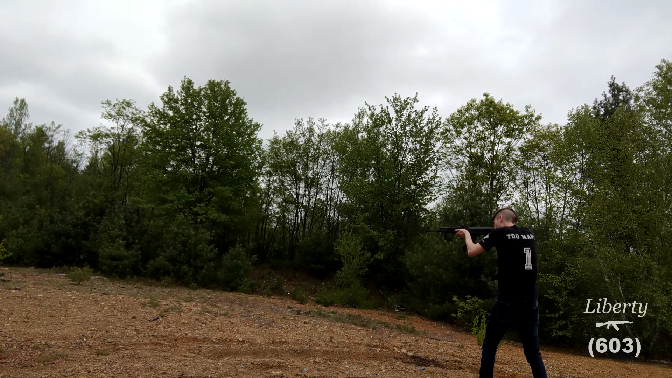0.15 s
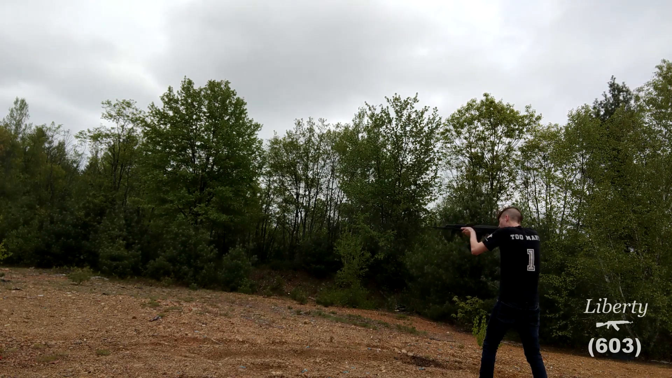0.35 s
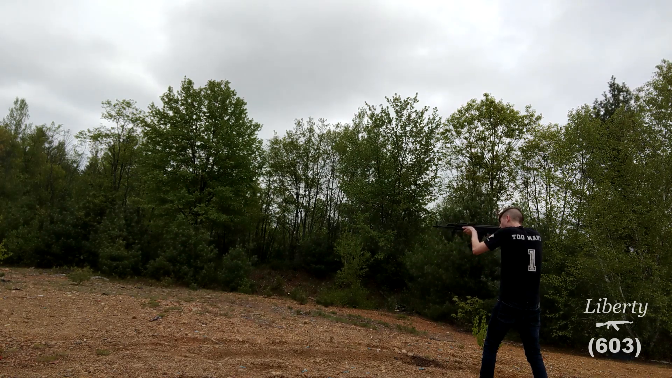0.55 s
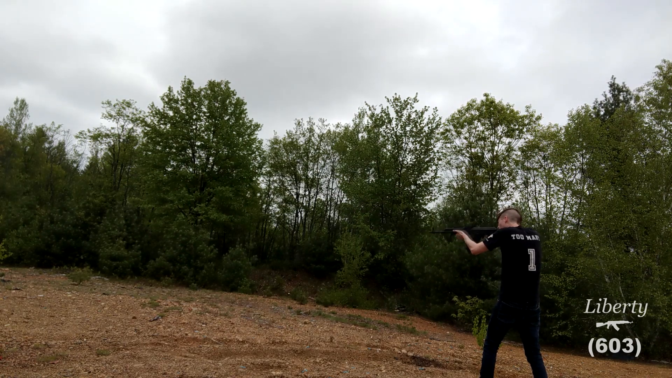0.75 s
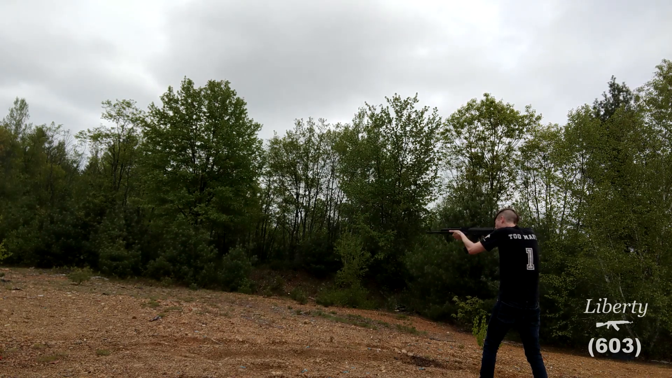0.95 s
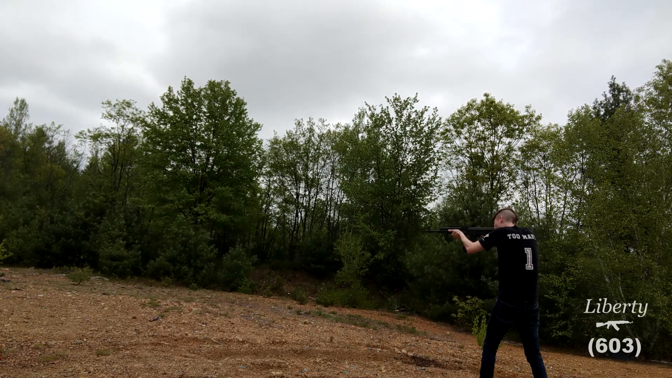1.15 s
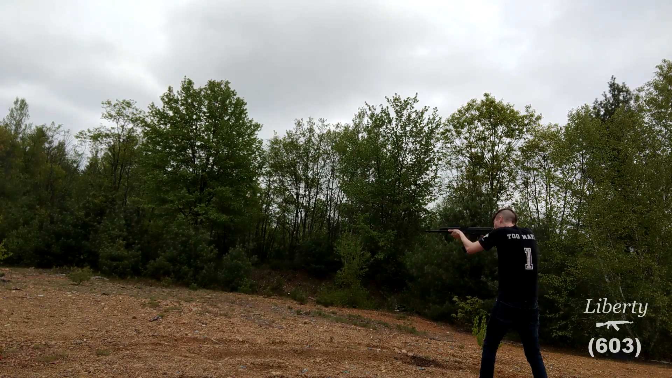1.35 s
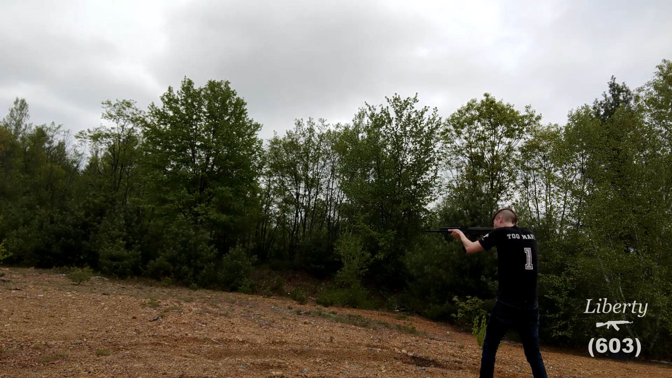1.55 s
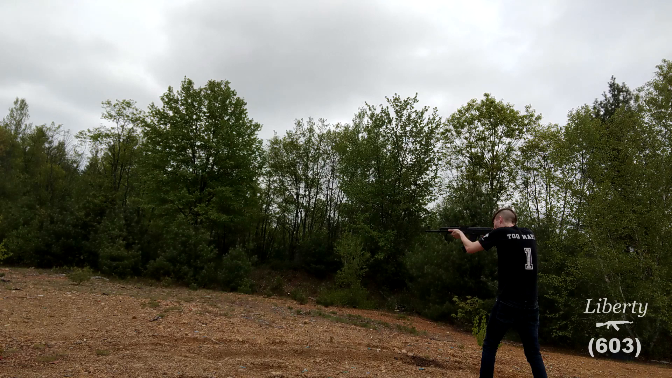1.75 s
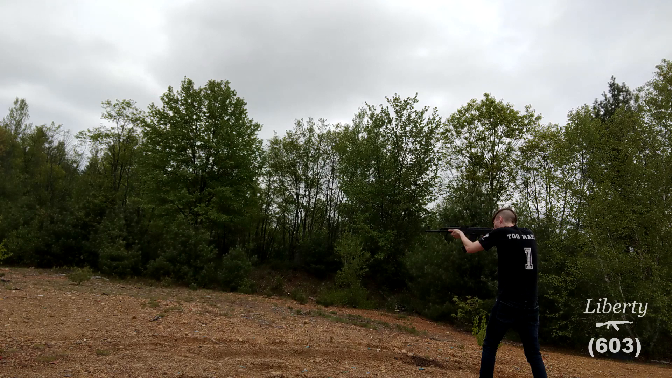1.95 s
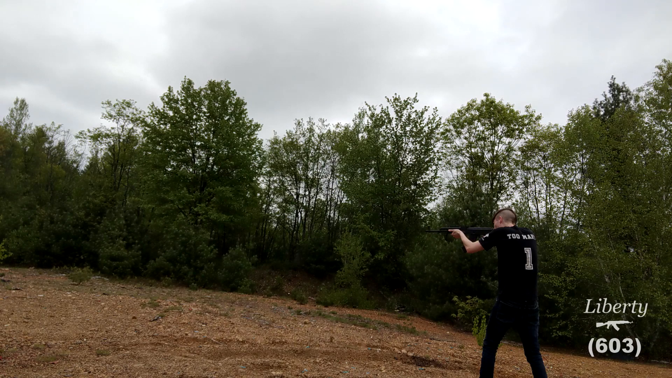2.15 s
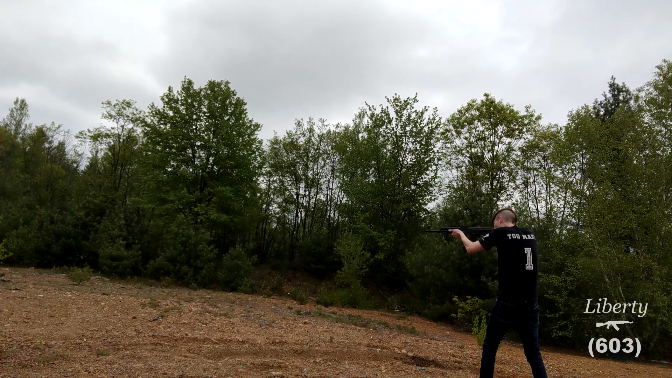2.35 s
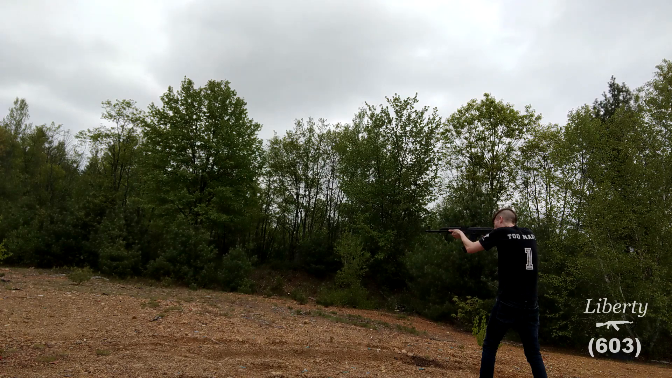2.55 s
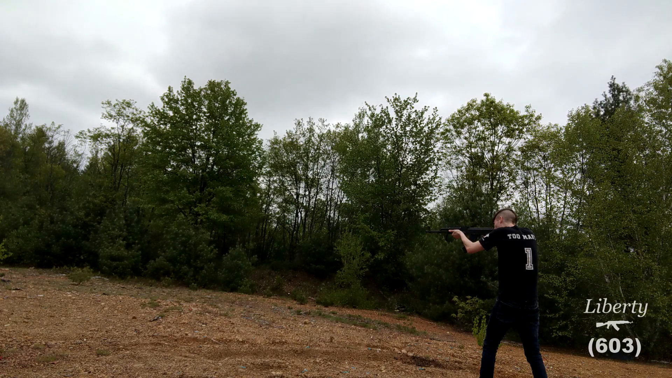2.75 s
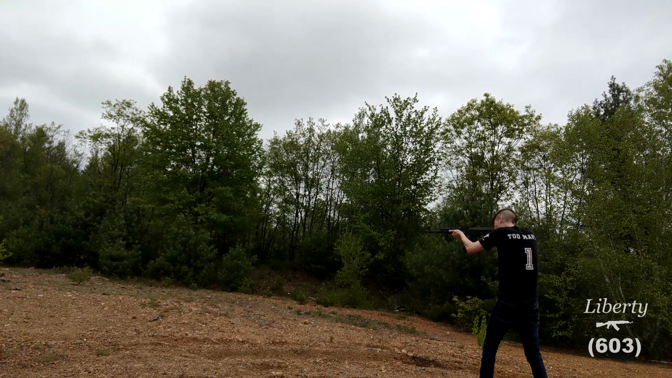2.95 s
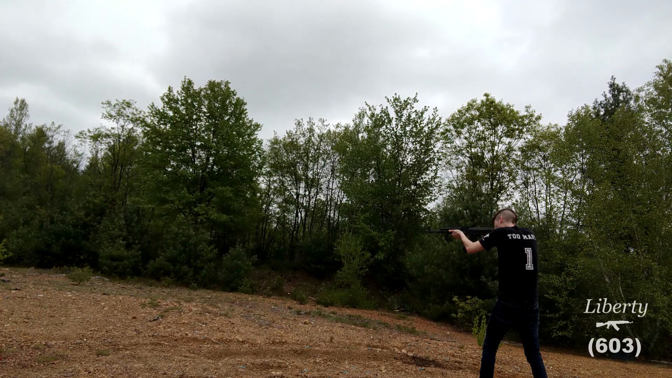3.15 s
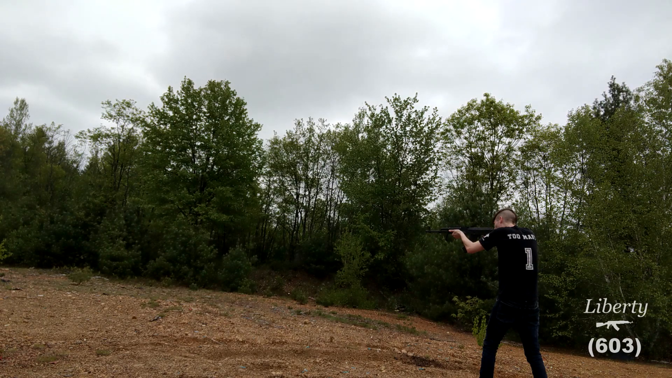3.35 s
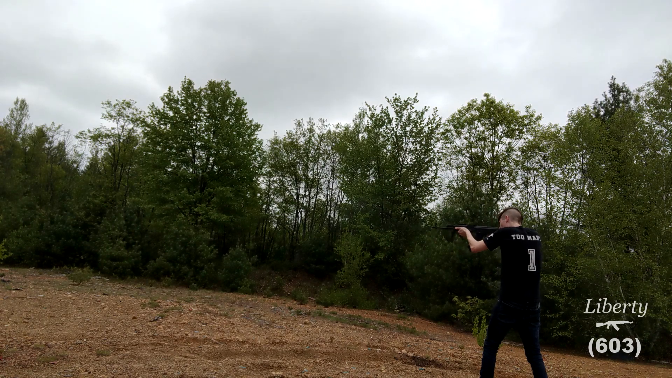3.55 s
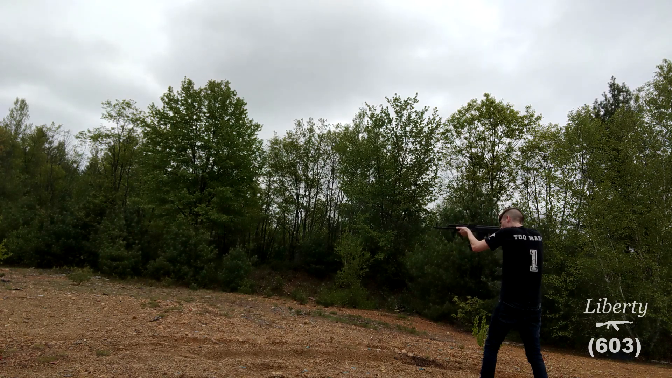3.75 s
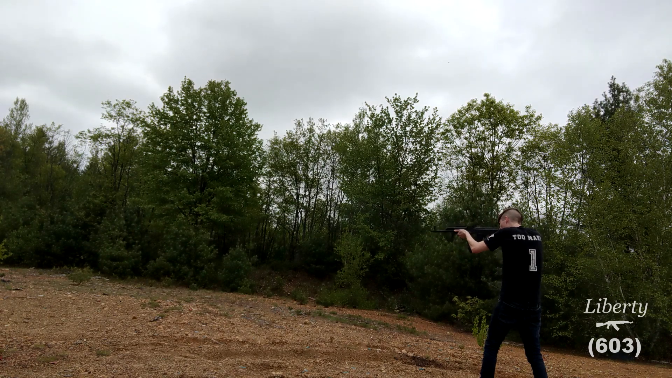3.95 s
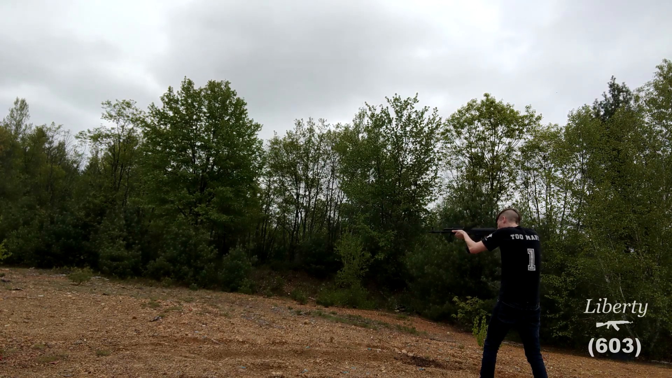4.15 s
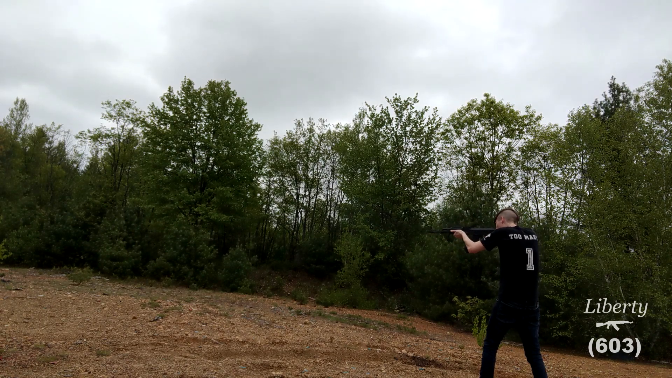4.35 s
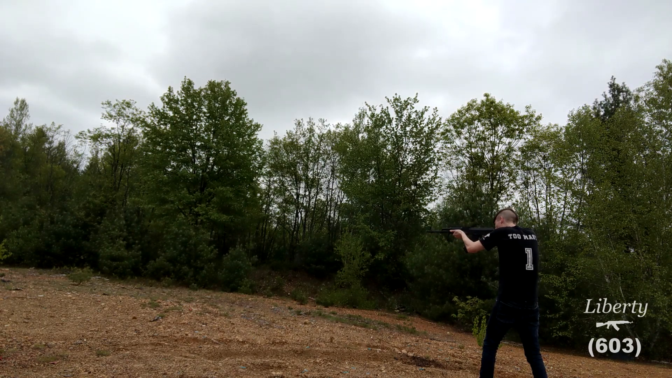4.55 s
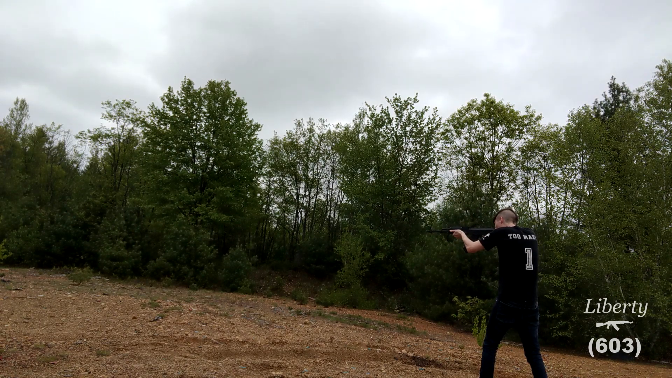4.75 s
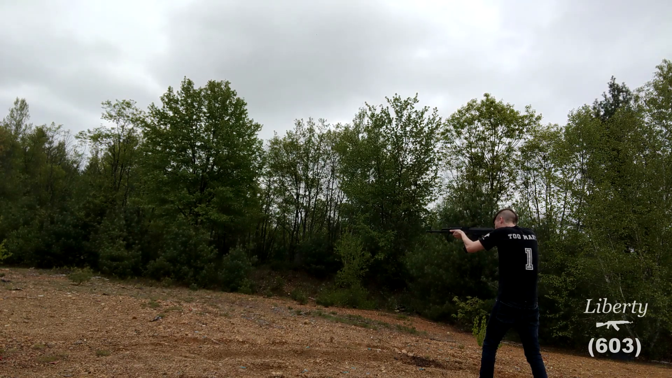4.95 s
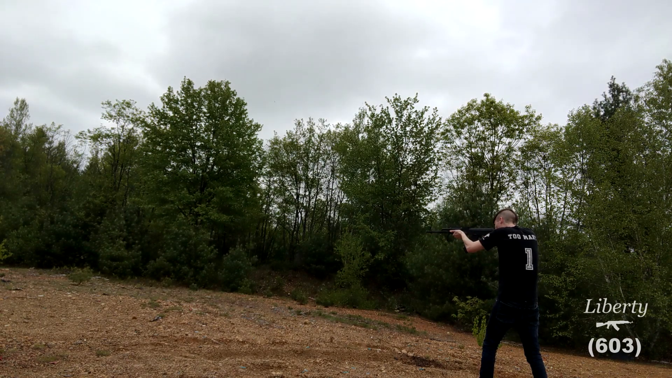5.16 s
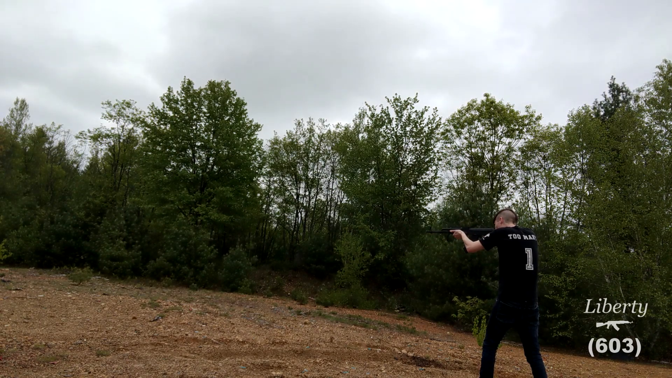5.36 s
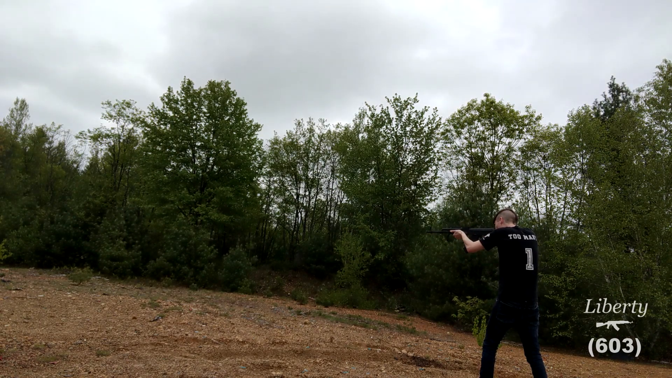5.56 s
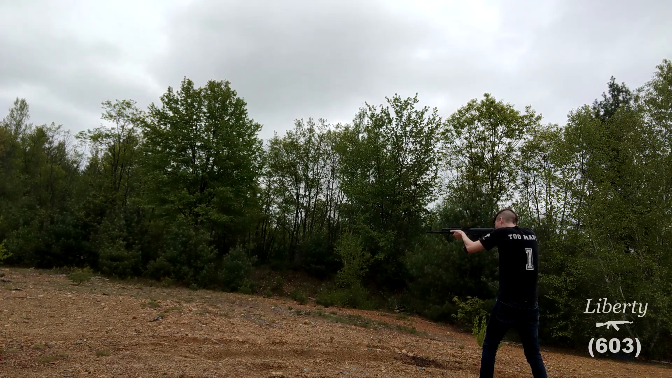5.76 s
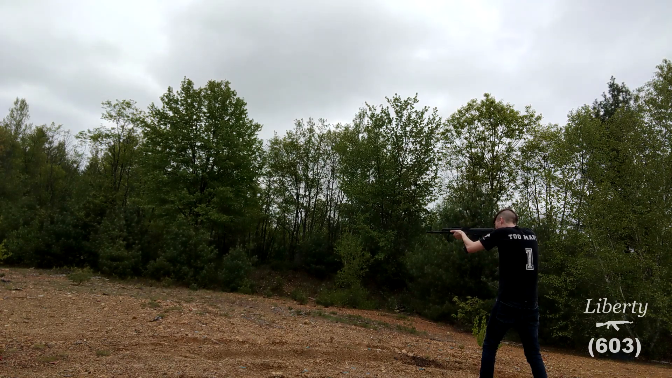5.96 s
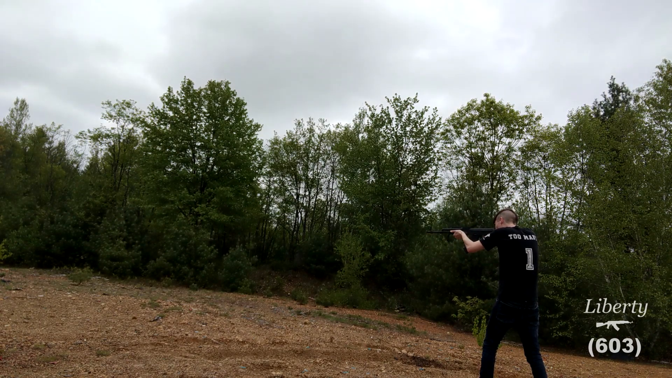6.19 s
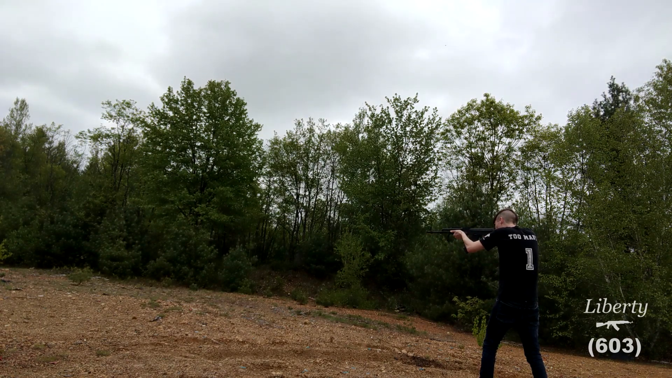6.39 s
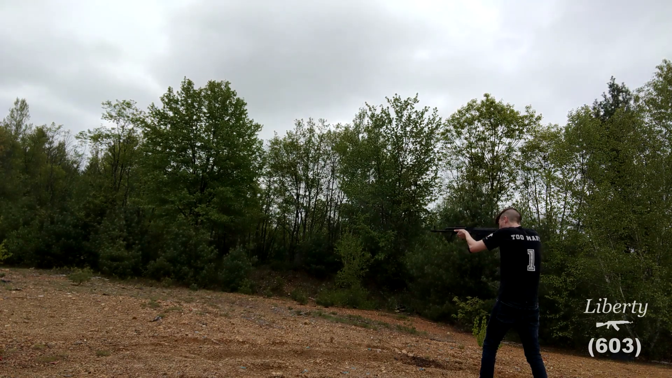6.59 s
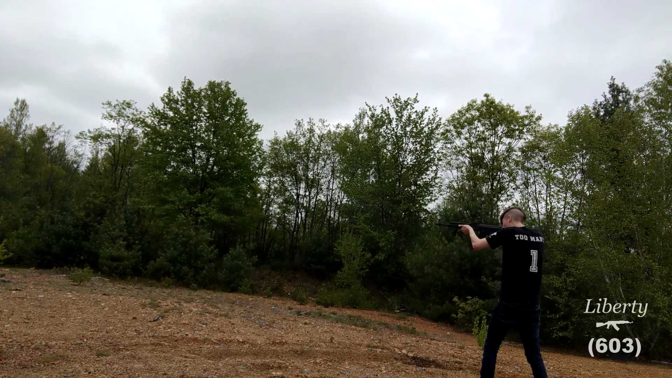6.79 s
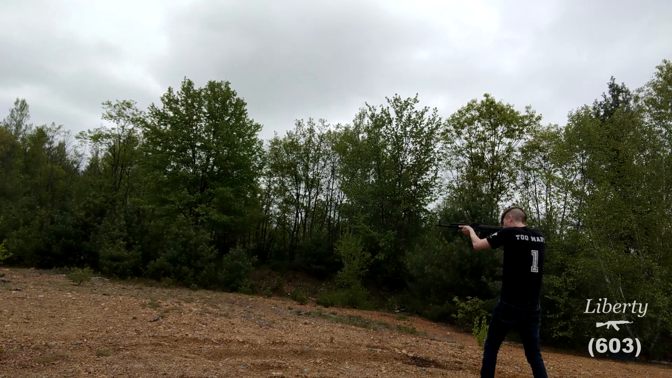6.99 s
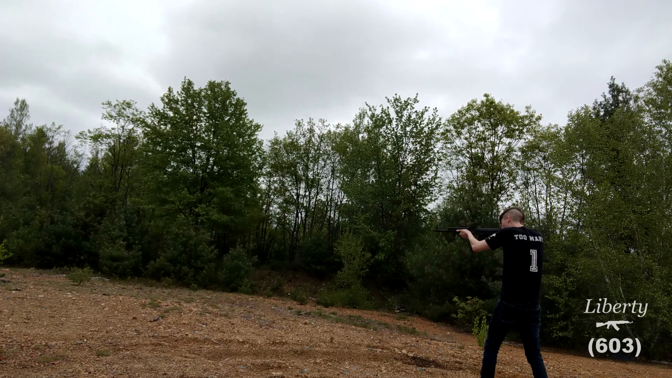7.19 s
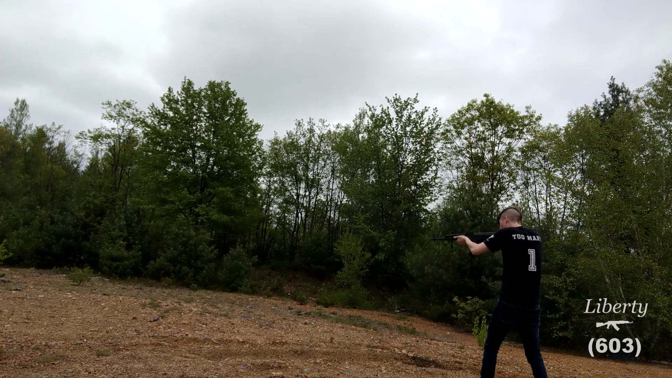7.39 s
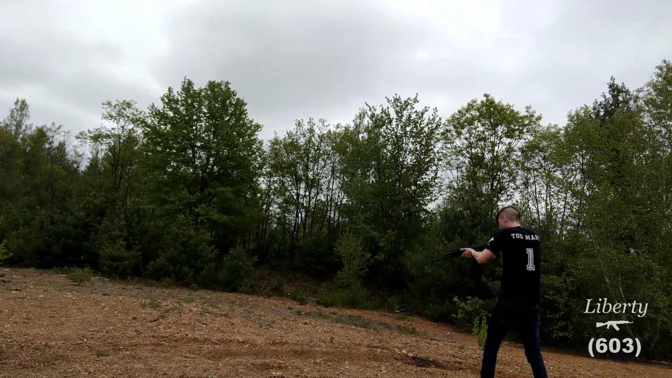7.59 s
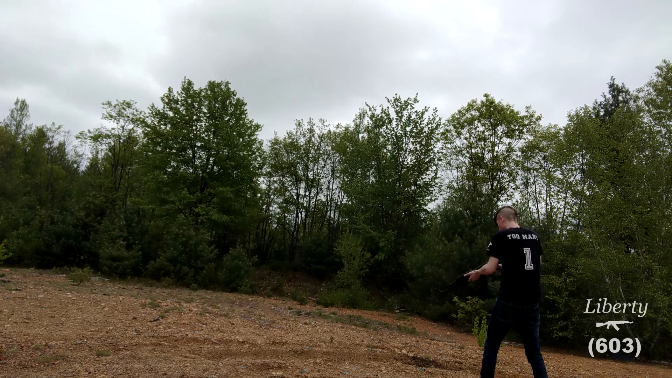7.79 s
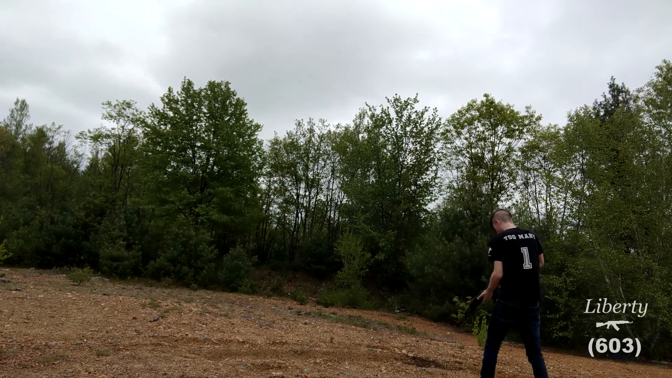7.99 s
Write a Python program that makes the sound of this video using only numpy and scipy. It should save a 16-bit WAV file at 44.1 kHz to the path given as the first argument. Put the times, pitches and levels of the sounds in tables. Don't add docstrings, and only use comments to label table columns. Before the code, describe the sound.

A quiet outdoor clearing opens with faint rustle and light microphone hiss. At 0.3 s a rifle shot cracks, abrupt and overloaded, with a dense body and short boom; slaps return within about a tenth of a second, then scattered tree echoes roll away, losing treble over two seconds. Tiny brass tinks skip on stones around 1.5 to 1.8 s, and a soft low thump comes at 1.2 s as the microphone gain shifts. Low gusts swell near 2.3 and 3.3 s. The second shot, loudest and boomiest, hits at 3.5 s with a similar long echo, a thump near 4.5 s and clinks at 4.6 to 5.3 s. A gust rises before the third shot at 6.6 s, which is leaner in bass. Its echo fades beneath a clear bright case tink at 7.56 s and more near 8 s.

```python
import sys
import numpy as np
from scipy import signal
from scipy.fft import rfft, irfft
from scipy.io import wavfile
from scipy.ndimage import uniform_filter1d, map_coordinates

SR = 44100
rng = np.random.default_rng(int(sys.argv[2]) if len(sys.argv) > 2 else 0)


def voltage_ratio(level):
    return 10 ** (np.asarray(level, float) / 20)


def master(y):
    cut = np.clip(np.atleast_2d(y).T, -1, 1)
    pcm = np.round(cut * 32767)
    wavfile.write(sys.argv[1], SR, pcm.astype(np.int16))


N = 354105


def unit(x):
    return x / np.sqrt(np.mean(x ** 2) + 1e-20)


def along(points, hz):
    f, v = np.transpose(points)
    return np.interp(np.log(hz + 1), np.log(f + 1), v)


def filtered(x, gain):
    return irfft(rfft(x) * gain(np.fft.rfftfreq(x.shape[-1], 1 / SR)), x.shape[-1])


def coloured(x, gain):
    return unit(filtered(x, gain))


def hump(centre_hz, octaves):
    return lambda hz: np.exp(-.5 * (np.log2((hz + 1) / centre_hz) / octaves) ** 2) / np.sqrt(hz + 50)


def wobble(rate_hz, length):
    knots = rng.standard_normal(int(length * rate_hz / SR) + 4)
    return map_coordinates(knots, [np.arange(length) * rate_hz / SR])


def add(track, s, sound):
    part = track[round(s * SR):][:len(sound)]
    part += sound[:len(part)]


# (frequency [Hz], share [0-1])
SAME = [(100, 1), (600, .85), (2000, 0.6), (5000, 0.047)]


def echo_noise(place, fresh):
    share = np.clip(along(SAME, np.fft.rfftfreq(len(place), 1 / SR)), 0, 1)
    spectrum = rfft(place) * np.sqrt(share) + rfft(fresh) * np.sqrt(1 - share)
    return irfft(spectrum, len(place))


# (delay [s], t60 [s], level [dB], centre [Hz], width [octaves])
LEAD = [
    (-.026, .015, -58, 9000, .12),
    (-.026, .015, -60, 6300, .12),
    (-.007, .009, -28, 5000, 1.3),
    (-.0065, .015, -27, 1900, .5),
    (-.002, .02, -31, 3000, 1.5),
]
# (rise [s], t60 [s], level [dB], centre [Hz], width [octaves])
MUZZLE = [
    (0.00078, 0.052, 2, 150, 0.54),
    (0.0025, 0.073, 3, 400, 0.41),
    (.004, 0.065, 10, 885, .4),
    (0.00081, .07, 5, 2500, 0.74),
    (0.0012, 0.073, 3.5, 6000, 0.65),
    (.0005, 0.02, 0, 8000, 0.62),
]
# (delay [s], t60 [s], level [dB], centre [Hz], width [octaves])
SLAPS = [(.025, .2, -16.5, 1784, 2), (.056, 0.11, -8.5, 6000, 0.76), (.063, 0.086, -5, 1919, 1.3),
         (.078, .02, -10, 8210, 0.58), (.096, .07, -10.5, 1200, 1.1), (.1055, .008, -5.5, 6000, .9),
         (.125, .18, -10.5, 746, .65), (.125, .15, -28.5, 100, 0.62)]
# (delay [s], level [dB], centre [Hz])
TRUNKS = [(0.289, -28, 414.6), (.38, -18.5, 1680), (0.442, -16, 1300), (.45, -31, 350),
          (0.507, -23.5, 327.7), (0.652, -25.5, 345), (.72, -24, 345), (.81, -24, 332), (1.03, -26, 400)]


def returns():
    rise_share, trunk_rise_s, trunk_t60_s, trunk_octaves = .03, 0.0051, 0.12, 0.45
    near = [(delay, rise_share * t60, t60, *rest) for delay, t60, *rest in LEAD + SLAPS]
    muzzle = [(0, *row) for row in MUZZLE]
    far = [(delay, trunk_rise_s, trunk_t60_s, db, hz, trunk_octaves) for delay, db, hz in TRUNKS]
    return near + muzzle + far


# (time [s], peak [dB], boom [dB], slap [dB])
SHOTS = [
    (0.318, 8.5, 3.5, -2),
    (3.508, 9.5, 5, -2.5),
    (6.631, 8.5, -2, -3),
]
# (far edge late [s], 400 Hz tilt [dB], 1300 Hz tilt [dB], bright trunks [dB])
BEARING = [(-.03, -0.5, 1.5, 8), (.02, 0.04, 0.15, 0.5), (.045, 1, -1.5, -4)]


def blasts():
    push_late_s, push_s, push_hz = .003, 0.005, 62
    out, t = np.zeros(N), np.arange(SR // 2) / SR
    bursts = returns()
    place = rng.standard_normal((len(bursts), len(t)))
    for (s, peak_db, boom_db, slap_db), (*_, bright_db) in zip(SHOTS, BEARING):
        u = t / push_s
        push = np.sin(2 * np.pi * push_hz * t) * u * np.exp(-u)
        add(out, s + push_late_s, -voltage_ratio(boom_db + 13.5) * push)
        for noise, (delay, rise, t60, level_db, hz, octaves) in zip(place, bursts):
            burst = coloured(echo_noise(noise, rng.standard_normal(len(t))), hump(hz, octaves))
            shape = (1 - np.exp(-t / rise)) * voltage_ratio(-60 * t / t60)
            db = peak_db + level_db
            db += slap_db * (delay > .03) + boom_db * (hz < 200)
            db += bright_db * (delay > .3 and hz > 900)
            add(out, s + delay, voltage_ratio(db) * shape * burst)
    return out


# (delay [s], rise [s], fade [dB/s])
STANDS = [
    (.115, .025, 190.5),
    (0.088, 0.031, 35.5),
    (0.328, 0.057, 51.5),
    (.43, .015, 62.5),
    (.48, 0.07, 27),
    (0.641, 0.04, 39),
    (.95, .35, 10),
]
# (400 Hz [dB], 1300 Hz [dB], 5500 Hz [dB])
STAND_DB = [(-11, -15.5, -28.5), (-22.5, -7.5, -12), (-36, -18, -15), (-28, -17.5, -31), (-19, -13.5, -29),
            (-24.5, -23, -72), (-34, -34.5, -61)]
BAND_FADE = [0.81, 1.093, 1.59]


def stands(t, aim_db, late_s, low_db, mid_db):
    far_edge = 2
    power = 1e-12
    for k, ((delay, rise, fade), bands_db, db) in enumerate(zip(STANDS, STAND_DB, aim_db)):
        u = np.maximum(t - delay - late_s * (k == far_edge), 0)
        level_db = db + np.array(bands_db)[:, None] - fade * np.outer(BAND_FADE, u)
        power = power + ((1 - np.exp(-u / rise)) * voltage_ratio(level_db)) ** 2
    return 10 * np.log10(power) + np.array([[low_db], [mid_db], [0]])


# (frequency [Hz], density [dB per Hz])
FOLIAGE = [(30, -37.5), (60, -23), (130, -6), (250, 0), (400, 2.5), (800, -4), (1400, -5.5), (2300, -6),
           (3500, -8), (4100, -11.5), (6500, -11.5), (8500, -16), (12000, -18), (16000, -28.5)]
BANDS_HZ = [400, 1300, 5500]
# (level [dB], one per stand)
AIM = [(.1, -1.5, 5.1, 0.5, 0.019, 0.52, .1), (.1, 0.47, -0.42, 3.9, -0.69, .5, 0.44),
       (.1, -1.5, -0.69, 1, -1.57, -1.1, -0.46)]


def woods():
    out, length = np.zeros(N), 4 * SR
    place = rng.standard_normal(length)
    low_hz, mid_hz, high_hz = BANDS_HZ
    for (s, *_), aim_db, bearing in zip(SHOTS, AIM, BEARING):
        hz, t, z = signal.stft(echo_noise(place, rng.standard_normal(length)), SR, nperseg=512)
        low, mid, high = stands(t, aim_db, *bearing[:-1])
        octave = np.log2((hz[:, None] + 1) / np.array(BANDS_HZ))
        to_mid = np.clip(octave[:, :1] / np.log2(mid_hz / low_hz), 0, 1) ** (0.25 + 1.7 * t)
        to_high = np.clip(octave[:, 1:2] / np.log2(high_hz / mid_hz), 0, 1)
        to_high = to_high ** np.maximum(1.4 - 0.15 * t, .4)
        band_db = low + to_mid * (mid - low + 2) + to_high * (high - mid + 2)
        air_db = -38 * np.clip(hz[:, None] / high_hz - 1, 0, 9) * np.minimum(t, 1.05)
        thin_db = 5 * np.minimum(octave[:, :1] + 0.79, 0) * np.clip(t / 0.51 - .45, -.4, .8)
        clumps = uniform_filter1d(uniform_filter1d(rng.standard_normal(z.shape), 14, 0), 6, 1)
        colour_db = along(FOLIAGE, hz)[:, None]
        field = voltage_ratio(band_db + colour_db + air_db + thin_db + 0.86 * unit(clumps) + 16)
        roll = signal.istft(z * field, SR, nperseg=512)[1]
        trunks = voltage_ratio(0.93 * wobble(400, len(roll)))
        add(out, s, roll * unit(trunks))
    return out


# (time [s], peak [dB], ring [dB], tick [Hz], ring t60 [s])
CASES = [(1.477, -37.5, -22, 7300, .1), (1.486, -52, -10, 7200, .3), (1.607, -45.5, -23, 5960, .1),
         (1.617, -32.5, -10, 6800, 0.15), (1.627, -45, -30, 7200, 0.14), (1.793, -48.5, -34, 7100, .1),
         (1.805, -51, -35, 7100, .1), (1.821, -49, -34.5, 7100, .1), (4.631, -36, -40, 7230, 0.077),
         (4.686, -29, -11, 7500, 0.095), (4.69, -30, -13, 7000, 0.29), (4.915, -50, -12.5, 6350, 0.092),
         (4.929, -49, -24, 7000, .1), (4.95, -63, -4, 6940, .2), (5.324, -30.5, -40, 3670, .1),
         (5.326, -43, -41.5, 4770, 0.092), (7.557, -42, -27, 6540, .1), (7.5605, -21.5, -10, 7000, .11),
         (7.983, -39, -1, 6440, .2), (7.99, -35, -20, 7500, 0.096)]
CASE_HZ = [12200, 12390, 13150]
# (time [s], peak [dB], ring [dB], tick [Hz], t60 [s], ring [Hz])
END_ON = (1.53, -50, -9, 6500, .9, 5900)


def cases():
    split = .012
    out, t = np.zeros(N), np.arange(SR // 3) / SR
    fired = np.searchsorted([s for s, *_ in SHOTS], [s for s, *_ in CASES]) - 1
    bounces = [(*row, CASE_HZ[k]) for row, k in zip(CASES, fired)]
    for s, db, ring_db, tick_hz, t60, ring_hz in bounces + [END_ON]:
        tick = coloured(rng.standard_normal(len(t)), hump(tick_hz, .28)) * voltage_ratio(-60 * t / .012)
        edge = coloured(rng.standard_normal(len(t)), hump(tick_hz, 1.01)) * voltage_ratio(-60 * t / 0.0042)
        rattle = coloured(rng.standard_normal(len(t)), hump(ring_hz, 0.048)) * voltage_ratio(-60 * t / 0.014)
        tick += 1.1 * edge + voltage_ratio(ring_db + 9.5) * rattle
        turning = np.minimum(t / .025, 1)
        flicker = voltage_ratio(5 * turning * wobble(70, len(t)))
        tumble = flicker * np.sin(2 * np.pi * ring_hz * t + .9 * wobble(91.3, len(t)))
        tumble *= 1 + 0.32 * np.cos(2 * np.pi * ring_hz * split * t)
        ring = voltage_ratio(ring_db - 60 * t / t60) * tumble
        add(out, s, (1 - np.exp(-t / 0.00066)) * voltage_ratio(db - 7.5) * (tick + ring))
    return out


# (frequency [Hz], density [dB per Hz])
BREEZE = [(15, -36), (25, -11), (55, 2.5), (149, -3), (250, -9.5), (359, -8.5), (558, -11.5), (3000, -25),
          (3900, -55), (6600, -120)]
# (peak time [s], level [dB])
GUSTS = [(2.3, -51.5), (2.52, -65), (3.13, -65.5), (3.31, -51), (5.3, -67.5), (5.85, -73.5), (6.56, -52.5)]


def breeze():
    breeze_db, calm_db = -61.5, -78.5
    rise_db_per_s, fall_db_per_s = 46, 150
    t = np.arange(N) / SR
    rustle = coloured(rng.standard_normal(N), lambda hz: voltage_ratio(along(BREEZE, hz)))
    swell = voltage_ratio(calm_db)
    for s, db in GUSTS:
        swell = swell + voltage_ratio(db - np.where(t < s, rise_db_per_s * (s - t), fall_db_per_s * (t - s)))
    gusts = voltage_ratio(-5.0) * swell * coloured(rng.standard_normal(N), hump(78, 0.69))
    return voltage_ratio(breeze_db + 1.5 * wobble(6, N)) * rustle + gusts


def scene():
    return (blasts() + woods() + cases() + breeze())[None]


def masked(x):
    hz, _, z = signal.stft(x, SR, nperseg=1024)
    power = np.abs(z) ** 2
    band = uniform_filter1d(uniform_filter1d(power, 6, 1), 2, 2)
    bar_db = 2 * along([(9000, -85), (12000, -70), (14800, -69), (15600, -64)], hz)
    bar = power.sum(1, keepdims=True) * voltage_ratio(bar_db)[:, None]
    return signal.istft(z * (band > bar), SR, nperseg=1024)[1][:, :N]


def top_cut(x):
    return signal.sosfilt(signal.butter(12, 17000, fs=SR, output="sos"), x)


# (time [s], gain [dB], own hiss [dB], thump [dB])
STEPS = [(0, -4.5, -72.5, -87), (0.315, -0.5, -70.5, -106), (0.764, -0.5, -59.5, -43),
         (1.223, 0, -63.5, -22.5), (2.812, -4.5, -66.5, -68), (3.509, -1.5, -59, -89.5),
         (4.48, -1, -63.5, -20), (5.872, -6, -66.5, -77), (6.633, 0, -60.5, -82.5),
         (7.559, -0.5, -61.5, -59.5)]
# (frequency [Hz], density [dB per Hz])
HISS = [(500, -1.5), (2500, 3), (5500, 3), (8000, -2.5), (16000, 0)]
# (centre [Hz], width [Hz], level [dB])
MICROPHONE = (8800, 3100, -7.5)


def record(dry):
    when, gain_db, hiss_db, _ = np.transpose(STEPS)
    step = np.searchsorted(when, np.arange(N) / SR, side="right") - 1
    hiss = coloured(rng.standard_normal(N), lambda hz: voltage_ratio(along(HISS, hz)))
    thumps, t = np.zeros(N), np.arange(SR // 10) / SR
    swing = (.2 + t / .002) * (1 - t / .0065) * np.exp(-t / .0033)
    for s, _, _, db in STEPS:
        add(thumps, s, voltage_ratio(db) * swing)
    peak_hz, width_hz, peak_db = MICROPHONE
    x = dry + voltage_ratio(peak_db) * signal.lfilter(*signal.iirpeak(peak_hz, peak_hz / width_hz, SR), dry)
    x = signal.sosfilt(signal.butter(2, 40, "high", fs=SR, output="sos"), x)
    x = x * voltage_ratio(gain_db[step]) + voltage_ratio(hiss_db[step]) * hiss + thumps
    x = x / (1 + np.abs(x / 0.87) ** 8) ** (1 / 8)
    x = signal.sosfilt(signal.butter(2, 24, "high", fs=SR, output="sos"), x)
    limit = signal.ellip(12, .3, 75, 15750, fs=SR, output="sos")
    mix = signal.sosfilt(limit, masked(x))
    return top_cut(mix)


dry = scene()
out = record(dry)
master(out)
```